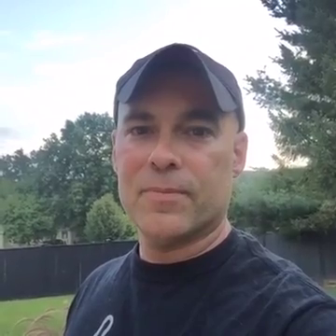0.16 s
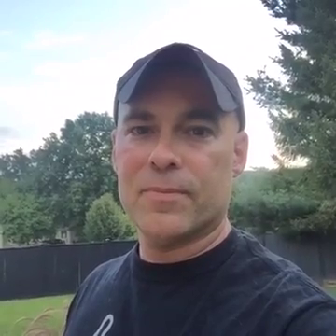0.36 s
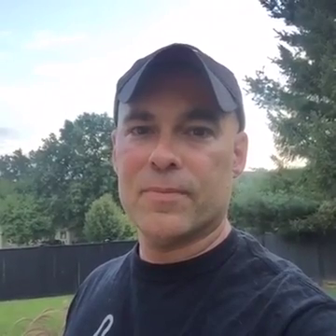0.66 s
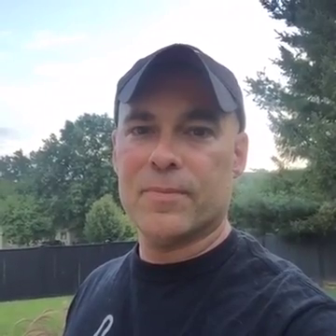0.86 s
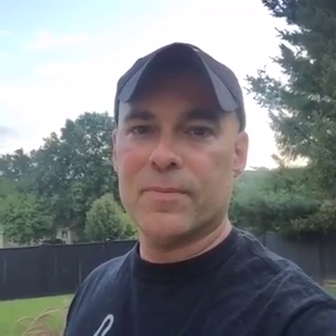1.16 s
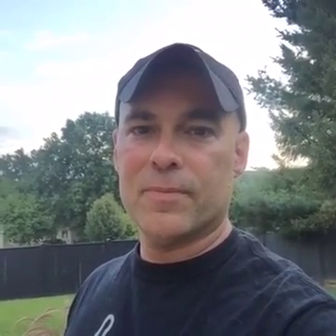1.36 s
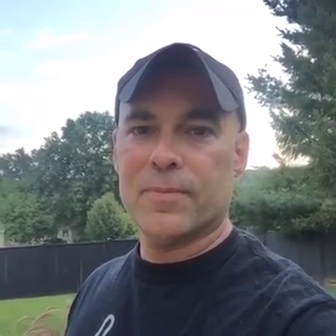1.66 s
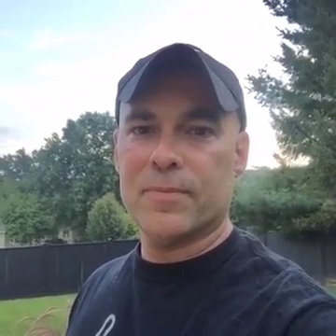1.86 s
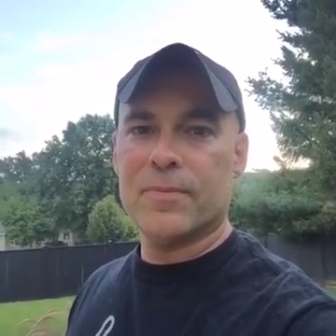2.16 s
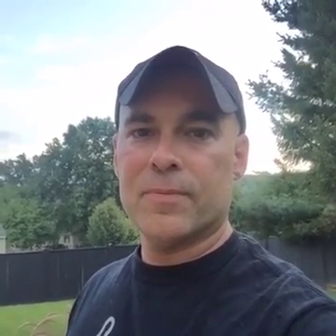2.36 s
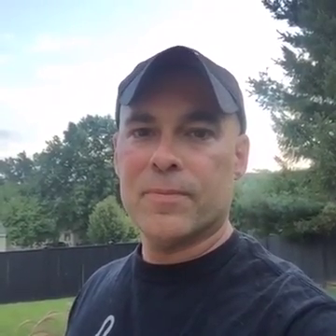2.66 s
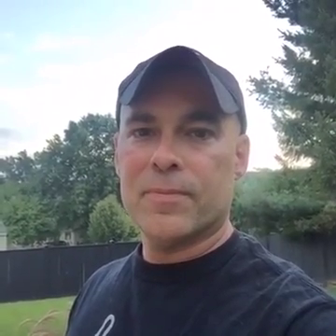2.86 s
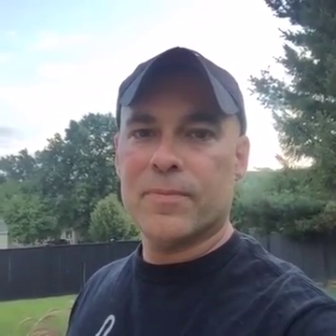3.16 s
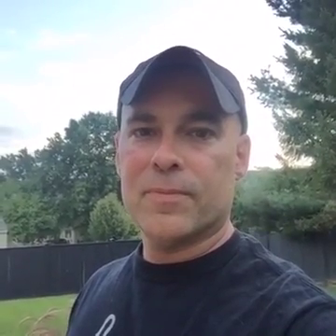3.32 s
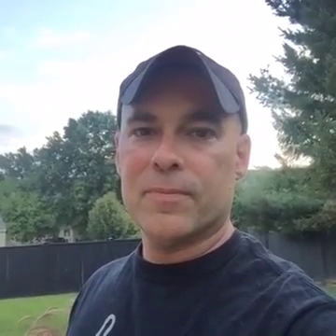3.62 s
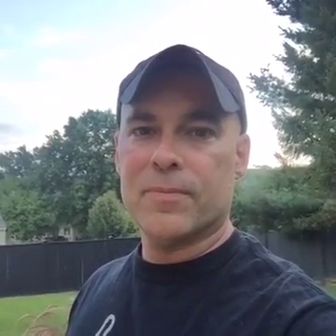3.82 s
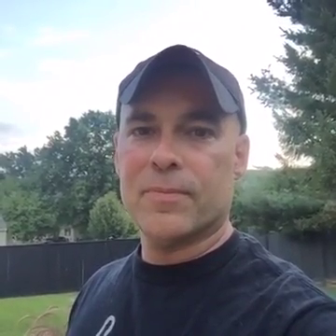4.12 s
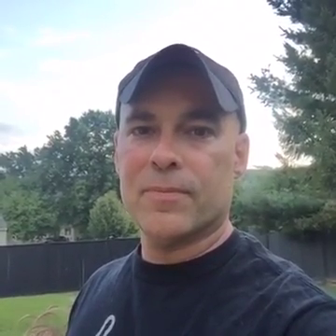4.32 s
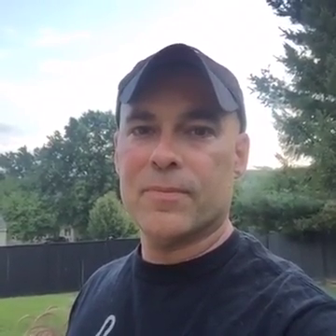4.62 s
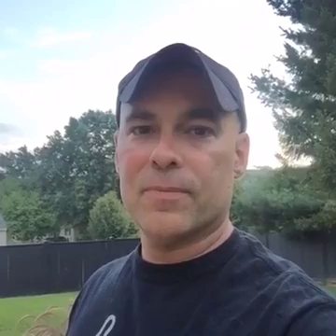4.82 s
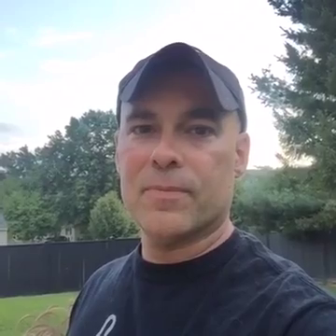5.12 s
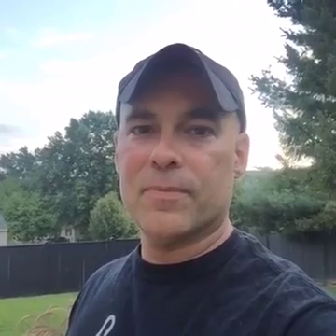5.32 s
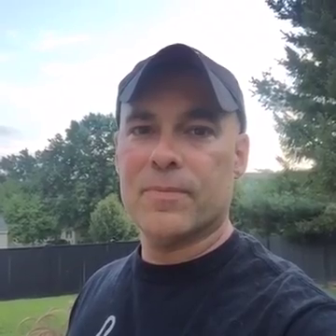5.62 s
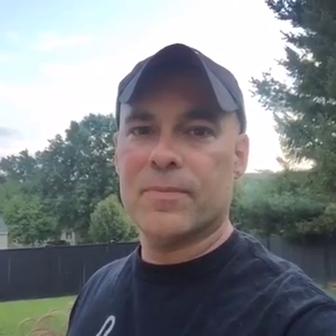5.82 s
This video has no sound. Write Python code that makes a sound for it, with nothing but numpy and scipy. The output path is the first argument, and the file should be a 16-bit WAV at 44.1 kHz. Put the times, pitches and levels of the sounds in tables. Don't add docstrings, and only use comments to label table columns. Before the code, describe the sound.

Shrill pulsing insect buzz fills a dusk back yard above faint rumble and hum, then a distant motor drone slowly grows.

```python
import sys
import numpy as np
from scipy import signal
from scipy.fft import rfft, irfft
from scipy.io import wavfile
from scipy.ndimage import uniform_filter1d

SR = 44100
rng = np.random.default_rng(int(sys.argv[2]) if len(sys.argv) > 2 else 0)


def wav_out(sig):
    wavfile.write(sys.argv[1], SR, np.round(np.clip(np.atleast_2d(sig).T, -1, 1) * 32767).astype(np.int16))


def ratio(d):
    e = np.asarray(d, float) / 20
    return 10 ** e


N = 263714


def rms_one(x):
    return x / np.sqrt(np.mean(x ** 2) + 1e-20)


def in_time(rows):
    s, *columns = np.transpose(rows)
    return [np.interp(np.arange(N) / SR, s, c) for c in columns]


def bump(centre_s, span_s):
    return np.exp(-.5 * ((np.arange(N) / SR - centre_s) / span_s) ** 2)


def drift(rate):
    r = np.exp(-80 * np.pi * rate / SR)
    coarse = rng.standard_normal(N // 40 + 2002)
    slow = signal.lfilter([1], [1, -2 * r, r * r], coarse)[2000:]
    return np.interp(np.arange(N) / 40, np.arange(len(slow)), rms_one(slow))


def resonance(x, hz, width_hz):
    r = np.exp(-np.pi * width_hz / SR)
    rise = np.array([1, 0, -1]) * (1 - r * r) / 2
    ring = [1, -2 * r * np.cos(2 * np.pi * hz / SR), r * r]
    return signal.lfilter(rise, ring, x)


def narrow_band(x, hz, width_hz):
    return resonance(resonance(x, hz, width_hz), hz, width_hz)


def wash(spectrum, patchy_db, per_octave):
    hz, level_db = np.transpose(spectrum)
    bins = np.fft.rfftfreq(N, 1 / SR)[1:]
    curve_db = np.interp(np.log(bins), np.log(hz), level_db, -120, -120)
    shaped = rfft(rng.standard_normal(N))[1:] * ratio(curve_db)
    place = per_octave * np.log2(bins / hz[0])
    out = 0
    for k in range(int(per_octave * np.log2(hz[-1] / hz[0])) + 2):
        share = np.clip(1 - np.abs(place - k), 0, 1)
        out = out + irfft(np.r_[0, shaped * share], N) * ratio(patchy_db * drift(6.9))
    return rms_one(out)


def foliage(x, t60, wet_db):
    t = np.arange(SR // 2) / SR
    tail = rng.standard_normal(len(t)) * ratio(-60 * t / t60)
    return x + ratio(wet_db) * signal.fftconvolve(x, tail / np.sqrt(np.sum(tail ** 2)))[:N]


# (time [s], throbs [1/s])
CICADA_PACE = [(0, 5.11), (.5, 4.36), (1.2, 5.4), (2.5, 5.39), (3.3, 5.83), (3.8, 5.74), (4.1, 7.3),
               (4.5, 6.59), (4.8, 6.93), (5.2, 5.78), (5.6, 8.43), (5.98, 3.38)]
# (time [s], level [dB])
CICADA_EFFORT = [
    (0, -70.5),
    (.4, -71.5),
    (1.0, -64.5),
    (2.4, -64.5),
    (3.3, -62.5),
    (4.4, -63.5),
    (5.4, -64.5),
    (5.98, -67.5),
]
# (pitch [Hz], width [Hz], level [dB])
CICADA_BODY = [(4110, 830, -11), (6270, 990, 1), (7380, 1740, -4.5), (8610, 1740, -13.5),
               (9620, 1140, -17.5), (11750, 1060, -23), (12400, 740, -21.5), (13500, 2100, -26),
               (15200, 1200, -37)]


def near_cicada(buckles_per_s, rise, pause_db, climb_db, start_s, stop_s):
    (pace,), (strength_db,) = in_time(CICADA_PACE), in_time(CICADA_EFFORT)
    sung = .61 + np.cumsum(pace) / SR
    throb, within = sung.astype(int), sung % 1
    since_s, left_s = within / pace, (1 - within) / pace
    climb = np.where(within < rise, within / rise, (1 - within) / (1 - rise))
    pause = 1 - np.clip(np.minimum(since_s / start_s, left_s / stop_s), 0, 1)
    scatter_db = .3 * rng.standard_normal(throb[-1] + 1)[throb]
    effort = ratio(strength_db + scatter_db + climb_db * climb + pause_db * pause)

    sizes = ratio(1.5 * rng.exponential(1, N)) * rng.choice([-1, 1], N)
    clicks = sizes * (rng.random(N) < buckles_per_s / SR)

    overtone_db = 1.8 - 0.2 * (strength_db - strength_db.mean())
    overtone_db = overtone_db - 16 * bump(centre_s=4.2, span_s=2) * pause
    turned_db = -9 * bump(centre_s=4.0, span_s=.6)
    body = 0
    for k, (hz, width_hz, db) in enumerate(CICADA_BODY):
        level_db = db + overtone_db * (hz > 11000) + turned_db * (hz > 13000) + 0.62 * drift(19.0)
        body = body + (-1) ** k * ratio(level_db) * narrow_band(clicks, hz, width_hz)
    return foliage(ratio(13.5) * effort * rms_one(body), t60=0.18, wet_db=-11)


# (time [s], level [dB])
CHORUS_SWELL = [
    (0, -47.5),
    (.9, -48.5),
    (2.3, -47),
    (4.3, -46),
    (5.2, -46.5),
    (5.98, -47.5),
]
# (pitch [Hz], level [dB per Hz])
CHORUS_COLOUR = [(2400, -55), (2900, -23), (3300, -13.5), (3900, -6), (4800, -5.5), (5450, -1.5),
                 (6300, -3), (7700, -6), (8800, -20), (9900, -25), (10300, -33.5), (12300, -26.5),
                 (14000, -35), (15300, -41)]
SINGER_HZ = [4014, 4624, 5294, 5660, 5998, 6127, 6250, 6394, 6482, 6721, 6933, 7072, 7562]
# (width [Hz], level [dB])
SINGER_BANDS = [(37.8, -63.5), (71, -66.5), (40, -73), (53, -60), (35, -60), (30, -60.5), (91, -61),
                (50, -65), (65, -63.5), (25, -69), (35, -67.5), (35, -61.5), (15.9, -70)]


def far_chorus():
    swell_db = in_time(CHORUS_SWELL)[0] + .2 * drift(11.0)
    white = rng.standard_normal(N)
    singers = 0
    for hz, (width_hz, db) in zip(SINGER_HZ, SINGER_BANDS):
        singers = singers + ratio(db + 2.1 * drift(2.5)) * rms_one(narrow_band(white, hz, width_hz))

    blur = wash(CHORUS_COLOUR, patchy_db=1.34, per_octave=4.9)
    shrill = signal.sosfiltfilt(signal.butter(4, 10500, "high", fs=SR, output="sos"), blur)
    blur = blur - 0.43 * bump(centre_s=5.1, span_s=0.9) * shrill
    return ratio(swell_db + 4) * rms_one(blur) + ratio(swell_db + 48) * singers


# (pitch [Hz], level [dB per Hz])
TOWN_COLOUR = [(12, -66), (20, -35), (38, -14.5), (87, -1.5), (105, -4.5), (118, -6.5), (152, -5),
               (175, -18.5), (203, -18.5), (229, -21), (354, -24.5), (632, -26), (936, -21.5), (1810, -36),
               (2800, -40.5), (3640, -69), (6160, -120)]


def town_rumble():
    return ratio(-47) * wash(TOWN_COLOUR, patchy_db=2.0, per_octave=3.04)


HUM_HZ = [56.6, 83.8, 95.5, 150.4]
# (level at the start [dB], change [dB per s])
HUM_LEVELS = [
    (-55, 0.06),
    (-50, -1.5),
    (-47, -2.5),
    (-54, -0.25),
]
# (pitch [Hz], width [Hz], level [dB])
WHINES = [
    (201, 19, -63.5),
    (354, 23, -70),
    (378, 25, -68.5),
]


def machinery():
    t = np.arange(N) / SR
    out = 0
    for hz, (level_db, slope) in zip(HUM_HZ, HUM_LEVELS):
        unsteady_db = level_db + slope * t + 1.27 * drift(8.6) + 2.6 * drift(2.3)
        out = out + ratio(unsteady_db) * np.sin(2 * np.pi * hz * t + 0.64 * drift(1.2))
    for hz, width_hz, db in WHINES:
        whine = rms_one(resonance(rng.standard_normal(N), hz, width_hz))
        out = out + ratio(db + 2.64 * drift(1.84)) * whine
    return out


def closing_db():
    t = np.arange(N) / SR
    return 4.5 * (t - t[-1])


# (pitch [Hz], level [dB per Hz])
TYRE_COLOUR = [(94, -18), (160, -3), (172, -18), (240, -22), (274, -14), (326, -23.5), (401, -18.5),
               (448, -21), (983, -16), (1900, -18), (3000, -25), (3900, -44), (6600, -120)]


def tyre_roar():
    level = ratio(-69) + ratio(-47 + closing_db())
    return level * wash(TYRE_COLOUR, patchy_db=0.45, per_octave=3.22)


# (time [s], firing tone [Hz], level [dB])
ENGINE = [
    (2.9, 142, -56),
    (3.3, 141, -47),
    (3.65, 140.6, -46.5),
    (3.92, 138.7, -53),
    (4.05, 136.3, -39.5),
    (4.25, 135.3, -39.5),
    (4.9, 134.7, -37.5),
    (5.2, 136, -37.5),
    (5.6, 137, -34.5),
    (5.98, 132, -36),
]
# (time [s], change [dB])
SHADOWS = [(4.14, -13), (4.25, 4), (4.45, -5), (4.58, 4), (4.65, -6.5), (5.18, 4.5), (5.25, -11),
           (5.34, -7), (5.535, -4.5), (5.59, 3), (5.84, -2)]
# (order [1], level at the end [dB], growth [dB per dB of closing], waver [dB])
NEAR_ORDERS = [
    (2, -44.5, 1, 2),
    (6, -58.5, 0.85, 1.5),
    (9, -62, 0.9, 3),
]
# (order [1], level against the firing tone [dB])
UPPER_ORDERS = [
    (4, -20.5),
    (8, -31),
]


def engine():
    t = np.arange(N) / SR
    firing_hz, open_db = in_time(ENGINE)
    shadow_db = sum(db * bump(s, span_s=0.016) for s, db in SHADOWS)
    firing_db = open_db + shadow_db + 0.27 * drift(3.0)
    turn = 2 * np.pi * np.cumsum(firing_hz / 3) / SR
    heard = np.clip((t - 2.7) / 0.6, 0, 1)
    coast_db = -26 * bump(centre_s=4.39, span_s=0.11)
    facing_db = 6.5 * bump(centre_s=5.44, span_s=0.17)

    tone = ratio(firing_db) * np.sin(3 * turn)
    for order, db, growth, waver_db in NEAR_ORDERS:
        level_db = db + growth * closing_db() + coast_db + facing_db * (order - 2) / 7
        tone += ratio(level_db + waver_db * drift(3.6)) * np.sin(order * turn)
    for order, db in UPPER_ORDERS:
        level = ratio(firing_db + db + 0.76 * drift(3.6))
        tone += level * np.sin(order * turn + 0.44 * drift(2.8))

    opposed = 3 * turn + np.pi + 2 * np.pi * 8.2 * (t - 3.5)
    second = ratio(-45.5) * bump(centre_s=3.29, span_s=0.31) * np.sin(opposed)
    return np.sqrt(2) * heard * (tone + second)


def scene():
    cicada = near_cicada(buckles_per_s=15000, rise=0.82, pause_db=-3, climb_db=7, start_s=0.038, stop_s=0.045)
    insects = cicada + far_chorus()
    background = town_rumble() + machinery()
    vehicle = tyre_roar() + engine()
    return (insects + background + vehicle)[None]


# (pitch [Hz], depth [dB])
DROPOUTS = [(0, 0), (1500, 0), (2200, -10), (2600, -22), (3250, -22), (3500, 0), (10000, 0), (10200, -16),
            (10900, -14), (11200, 0), (22050, 0)]


def noise_suppressor(x, mask_db, deepest_db, dropout_db):
    hz, _, bins = signal.stft(x, SR, nperseg=2048, noverlap=1536)
    power = uniform_filter1d(np.abs(bins) ** 2, size=3, axis=-1) + 1e-20
    usual_db = 10 * np.log10(uniform_filter1d(power, size=80, axis=-1))
    around_db = uniform_filter1d(usual_db, size=61, axis=-2)
    keep = np.sqrt(np.clip(1 - ratio(2 * (around_db + mask_db)) / power, ratio(2 * deepest_db), 1))

    patch = uniform_filter1d(uniform_filter1d(power, size=4, axis=-1), size=3, axis=-2)
    weak = patch < ratio(2 * (uniform_filter1d(usual_db, size=15, axis=-2) + dropout_db))
    depth_db = np.interp(hz, *np.transpose(DROPOUTS))[:, None]
    keep = keep * ratio(weak * depth_db)
    return signal.istft(bins * keep, nperseg=2048, noverlap=1536)[1][..., :N]


def roll_off(x):
    return signal.sosfilt(signal.butter(12, 15150, fs=SR, output="sos"), x)


def record(dry):
    cleaned = noise_suppressor(dry, mask_db=-5, deepest_db=-4, dropout_db=-2.8)
    return roll_off(cleaned)


dry = scene()
out = record(dry)
wav_out(out)
```